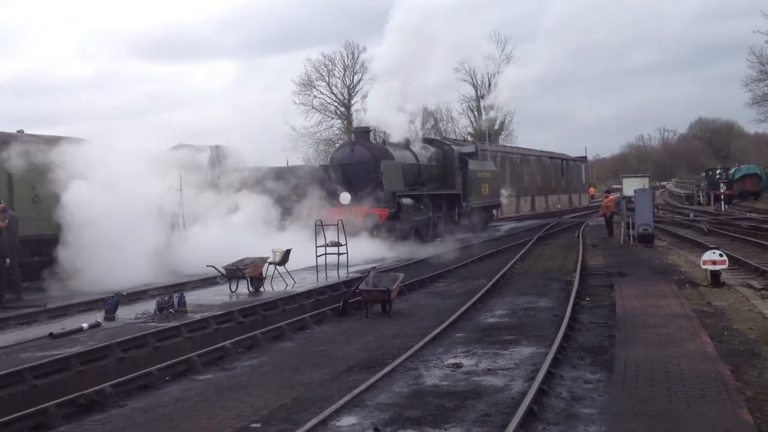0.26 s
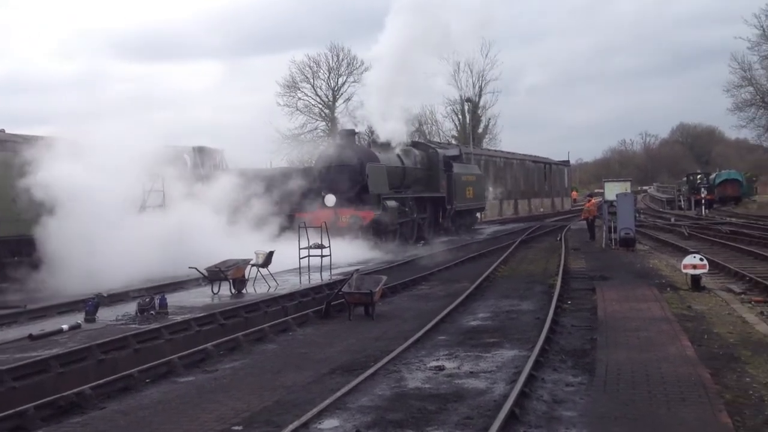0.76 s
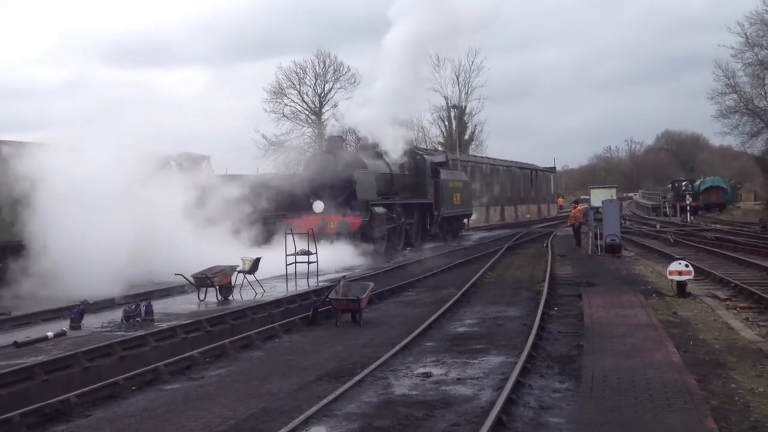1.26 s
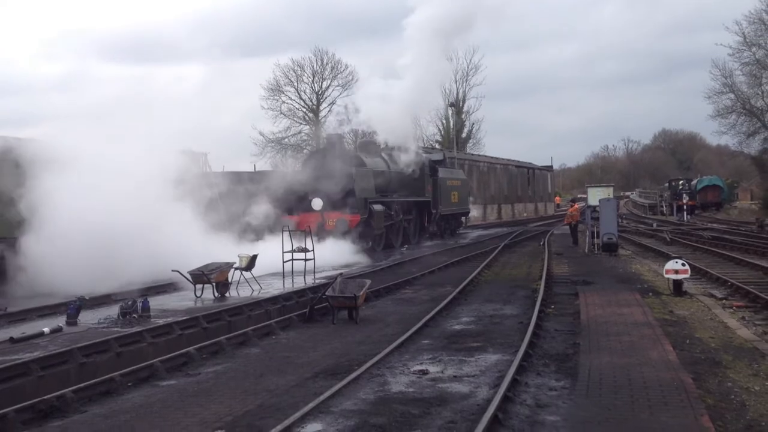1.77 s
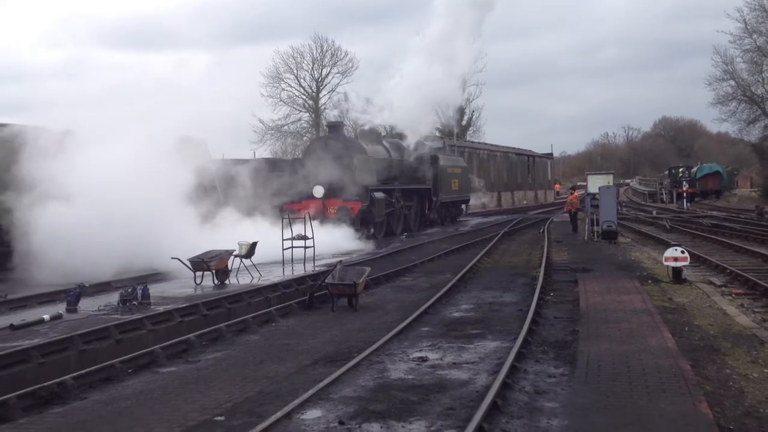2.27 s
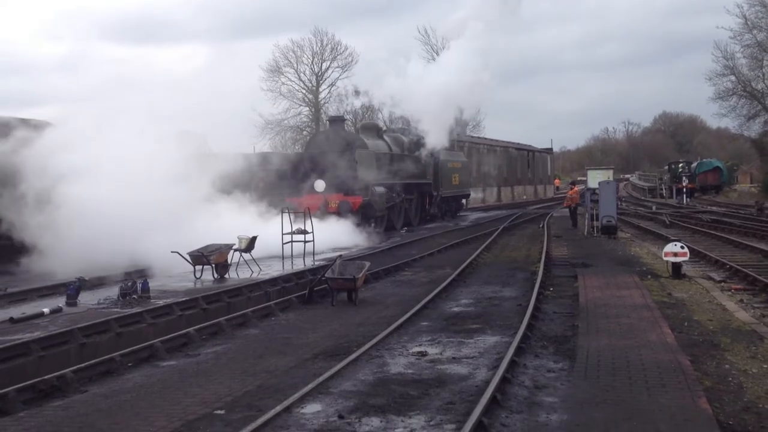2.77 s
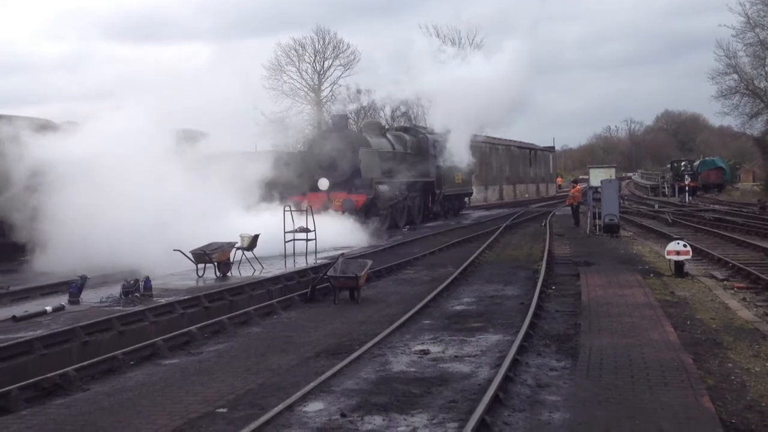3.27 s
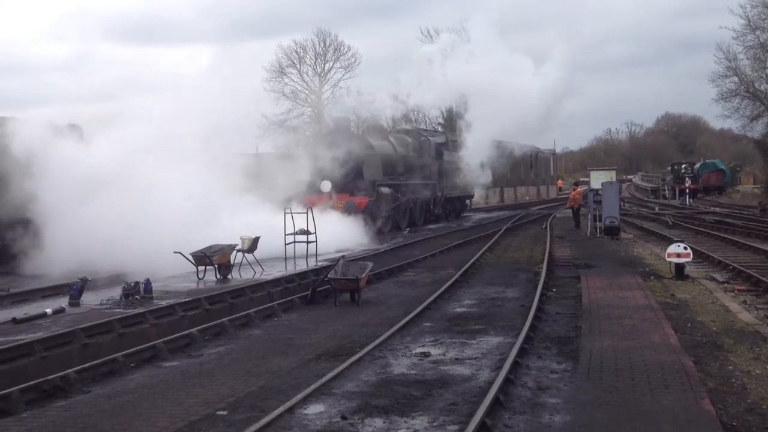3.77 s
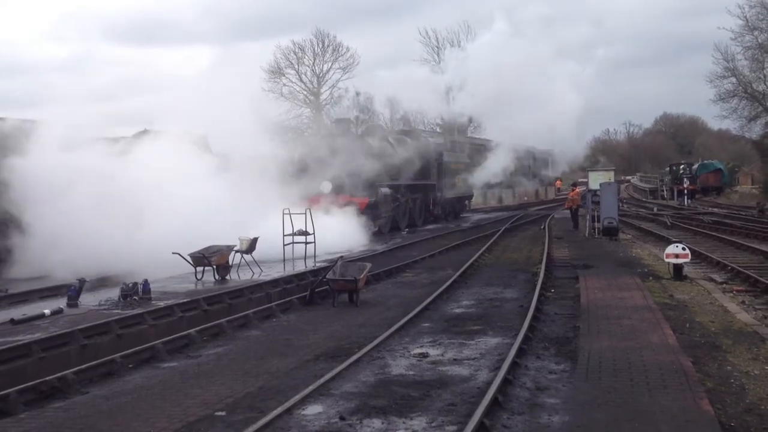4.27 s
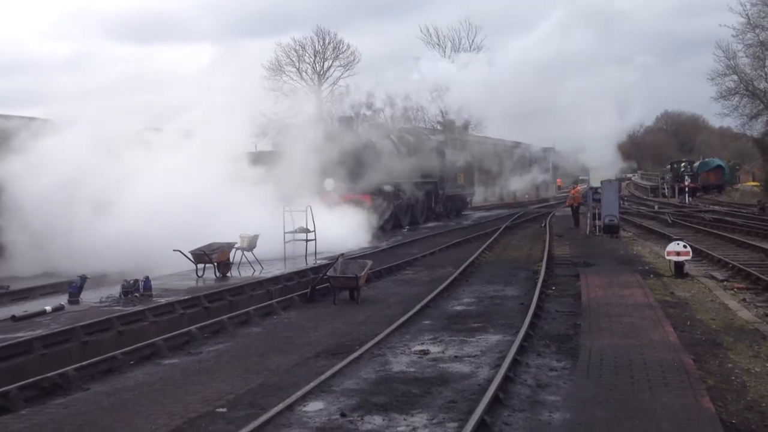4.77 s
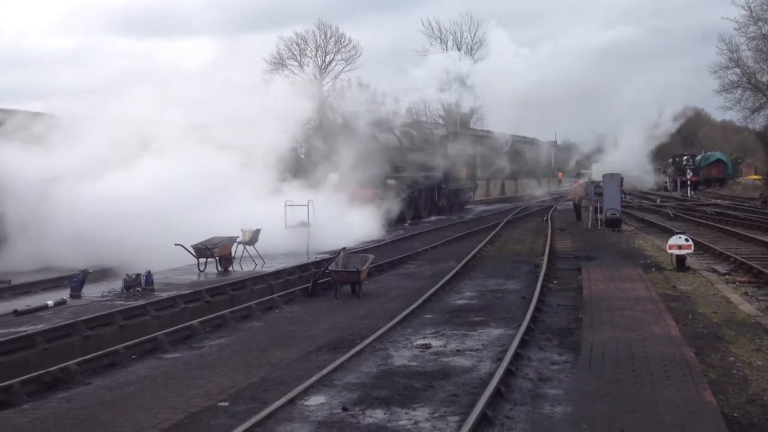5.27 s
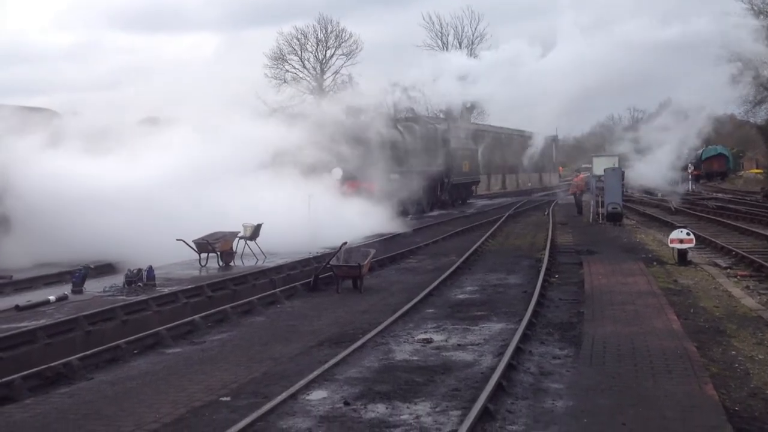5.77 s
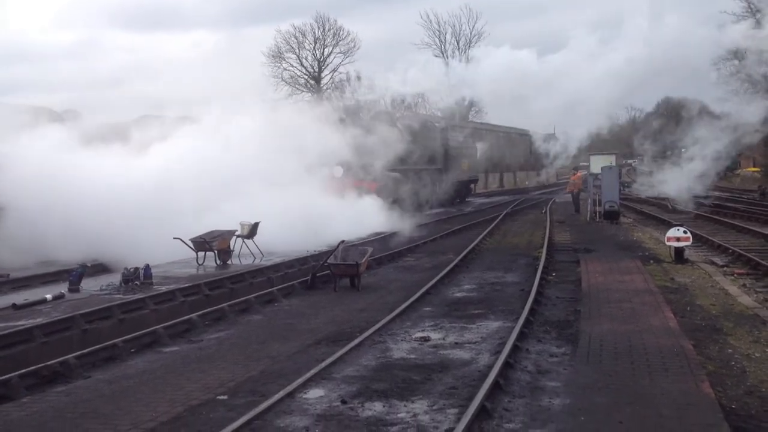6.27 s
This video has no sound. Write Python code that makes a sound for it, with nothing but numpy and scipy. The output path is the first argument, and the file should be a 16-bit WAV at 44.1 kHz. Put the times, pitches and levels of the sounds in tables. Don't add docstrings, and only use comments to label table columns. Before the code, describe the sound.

Unbroken steam hiss from an engine easing out of its shed. It starts moderate, with roar and wet hiss mixed, bulges with wet spray around one second and again near two, then sharpens into a loud, high, piercing jet through the middle. The treble briefly brightens near five seconds, then everything sinks to a softer, breathy rush. Open air, mid-distance, cheap camera microphone with hollow colouring.

```python
import sys
import numpy as np
from scipy import signal
from scipy.io import wavfile
from scipy.ndimage import uniform_filter1d

SR = 44100
rng = np.random.default_rng(int(sys.argv[2]) if len(sys.argv) > 2 else 0)


def gain_from_db(level_db):
    decades = np.asarray(level_db, float) / 20
    return 10 ** decades


def materialize(psi):
    bounded = np.clip(np.atleast_2d(psi).T, -1, 1)
    quanta = np.round(bounded * 32767).astype(np.int16)
    wavfile.write(sys.argv[1], SR, quanta)


N = 287973

# [t/s, level/dB]
BLOWER_LEVEL = [(0.0, -31), (0.14, -31.5), (1.62, -33), (2.07, -31.5), (2.14, -34), (2.85, -32),
                (2.89, -37.5), (3.05, -35), (3.38, -40.5), (3.56, -38.5), (4.35, -37.5), (4.71, -33),
                (5.51, -35.5), (6.53, -34)]
# [t/s, level/dB]
DULL_JET_LEVEL = [(0.0, -24), (0.02, -26.5), (0.14, -28.5), (0.53, -27), (0.95, -18), (1.31, -22.5),
                  (2.16, -20), (2.6, -25), (2.62, -20.5), (3.29, -25.5), (3.31, -31.5), (3.58, -30),
                  (3.6, -27), (4.42, -28.5), (5.04, -24), (5.65, -24.5), (6.15, -31), (6.53, -28.5)]
# [t/s, level/dB, centre f/Hz, sharpness of its edge/dB]
KEEN_JET_COURSE = [(0.0, -27, 6290, -10), (0.25, -29.5, 6220, -9.5), (1.05, -23, 7400, -11),
                   (1.51, -28.5, 6600, -16), (1.87, -28, 7350, -6.5), (2.14, -21, 5600, -9),
                   (2.6, -22.5, 6040, -13), (2.76, -17, 6030, -20), (2.96, -17, 6060, -22),
                   (3.25, -15, 6770, -11.5), (4.25, -16, 7130, -7), (4.58, -20.5, 6400, -10.5),
                   (4.76, -19, 8000, 0.5), (4.97, -18, 7600, -3.5), (5.16, -17, 6550, -12.5),
                   (5.65, -20, 7300, -10), (5.95, -30, 6400, -10), (6.53, -28.5, 6700, -8.5)]

# [f/Hz, density/dB per Hz]
ROAR_SPECTRUM = [(24, -77), (40, -52.5), (192, -1), (594, -6.5), (764, -4.5), (966, 3), (1030, -7),
                 (1150, -1.5), (1700, -6.5), (2210, -33), (3740, -120)]
# [f/Hz, density/dB per Hz]
ROAR_TOP_SPECTRUM = [(1300, -17), (1650, -3), (2000, 1.5), (2600, 0.5), (3200, 2.5)]
# [f/Hz, density/dB per Hz]
DULL_SPECTRUM = [(2200, -24), (2800, -5), (3300, -0.5), (3900, 2.5), (4400, -1.5), (5200, -24)]
# [f/Hz, density/dB per Hz]
DULL_TOP_SPECTRUM = [(3500, -23), (4150, -4), (4500, -5), (4900, -1), (5800, -22)]
# [f/Hz, density/dB per Hz]
KEEN_SPECTRUM = [(4000, 3), (5200, 5), (6500, 0), (8200, 3), (8900, -5.5), (10000, -23)]
# [f/Hz, density/dB per Hz]
SHOULDER_SPECTRUM = [(7600, -4.5), (8600, 2), (9400, -1.5), (10100, -10), (10800, -28), (12000, -34)]
# [f/Hz, density/dB per Hz]
TOP_HISS_SPECTRUM = [(9200, -26), (10600, 1.5), (11500, -3.5), (12400, 2), (13300, .3), (14100, -2),
                     (14800, -5), (15600, -5), (18000, -12)]

# [middle t/s, length/s, level/dB]
DRAUGHT_GULPS = [
    (.3, .15, -2),
    (.75, .2, -1),
    (1.0, .35, -2),
    (2.4, 0.36, -5.5),
    (2.78, 0.18, 1.5),
    (4.65, 0.39, 3.5),
    (5.5, 0.35, 1),
    (6.0, 0.19, -0.5),
]
# [middle t/s, length/s, level/dB]
WATER_SLUGS = [(.15, .2, 4.5), (.85, .2, 2), (1.15, .25, 3), (2.17, 0.29, 5.5), (2.55, 0.28, 3),
               (2.85, .3, 3.5), (3.85, 0.22, -3), (4.15, .3, -4), (4.55, .3, -3), (4.85, 0.37, -3),
               (5.17, 0.16, -1), (5.4, 0.25, -16), (5.68, .2, 2), (6.05, .3, -9), (6.4, .4, -5)]
# [middle t/s, length/s, level/dB]
KEEN_SPITS = [(.6, .3, -3), (.88, .2, 1.5), (1.08, 0.28, 2), (1.5, .3, 3), (2.1, .25, 2), (2.8, .15, 2),
              (2.95, .15, 1.5), (3.19, .2, 5.5), (3.5, .25, -8), (3.72, .2, -2), (3.95, .2, -1),
              (4.3, .1, 0), (4.43, 0.17, 5.5), (4.6, .2, 2), (5.0, .1, -5), (5.2, .1, -2), (5.38, .15, 3),
              (5.62, .15, 2), (6.3, .4, 3)]
# [middle t/s, length/s, level/dB]
VALVE_SURGES = [(.68, .15, -3), (.88, .25, 2), (2.57, .1, -2), (2.68, .12, 2), (2.93, .12, -2),
                (3.08, .12, 1.5), (3.55, .2, -1.5), (4.42, .2, 1.5), (4.65, .12, -2), (4.88, .12, 1.5),
                (5.15, .2, 1.5), (5.27, .08, -2), (6.08, .15, -1.5)]

# [delay/ms, level/dB]
YARD_ECHOES = [(3.1, -14.5), (4.7, -17), (7.1, -20.5), (10.9, -15), (15.3, -15), (21.7, -17)]
# [f/Hz, width/Hz, mean level/dB, wander/Hz]
PORT_NULLS = [(5000, 90, -4, 70), (9500, 60, -4, 40), (10100, 60, -5, 80), (10400, 115, -16, 70),
              (10960, 105, -17, 50), (11600, 70, -5, 50), (12800, 70, -4, 200), (13400, 70, -4, 150),
              (13800, 90, -7, 100), (14400, 80, -6, 100), (14750, 110, -8, 100), (15150, 80, -5, 60)]
# [f/Hz, width/Hz, level/dB]
HOUSING_RESONANCES = [(342, 13, 7), (440, 62, -3.5), (484, 33, 1), (555, 40, -7), (615, 143, 7),
                      (1052, 110, 4), (1510, 69, 4), (1570, 41, -7.5), (1742, 146, 3), (1854, 43, -3),
                      (2044, 380, 3), (2594, 125, -3.5), (2780, 440, 1), (3580, 630, 3.5),
                      (4000, 145, -3.5), (4365, 130, 3), (4550, 270, 6), (4920, 335, -6), (6400, 150, 1),
                      (10700, 150, 3)]
# [f/Hz, margin/dB]
MASKING_MARGIN = [(4800, 10.5), (9000, 8), (10000, 3.5), (11200, 3.8), (12500, 5.5), (14000, 3.5),
                  (16000, 3)]


def rms_one(x):
    return x / np.sqrt(np.mean(x ** 2) + 1e-20)


def in_time(rows):
    s, *columns = np.transpose(rows)
    return [np.interp(np.arange(N) / SR, s, column) for column in columns]


def swells(rows):
    s = np.arange(0, N, 64) / SR
    total_db = sum(db * np.exp(-8 * ((s - mid) / length) ** 2) for mid, length, db in rows)
    return np.interp(np.arange(N) / SR, s, total_db)


def both(a_db, b_db):
    return np.sqrt(gain_from_db(a_db) ** 2 + gain_from_db(b_db) ** 2)


def drift(rate):
    r = np.exp(-80 * np.pi * rate / SR)
    sparse = rng.standard_normal(N // 40 + 2002)
    slow = signal.lfilter([1], [1, -2 * r, r * r], sparse)[2000:]
    return np.interp(np.arange(N) / 40, np.arange(len(slow)), rms_one(slow))


def turbulence(spectrum, flutter_db, patchy_db, rate, centre_hz=None, lift_db=0., spread=.3, count=4):
    hz, db = np.transpose(spectrum)
    edges = hz[0] * 2 ** np.arange(0, np.log2(hz[-1] / hz[0]), 1 / count)
    white = rng.standard_normal((2, N))
    flutter = flutter_db * drift(rate)
    out = 0
    for k, (low, high) in enumerate(zip(edges, edges[1:])):
        mid = np.sqrt(low * high)
        band_pass = signal.butter(2, [low, high], "band", fs=SR, output="sos")
        band = signal.sosfilt(band_pass, white[k % 2])
        gain_db = np.interp(np.log(mid), np.log(hz), db) + flutter + patchy_db * drift(rate / 2)
        if centre_hz is not None:
            octaves_off = np.log2(mid / centre_hz)
            gain_db = gain_db + lift_db * np.exp(-.5 * (octaves_off / spread) ** 2)
        out = out + gain_from_db(gain_db) * band
    return rms_one(out)


def blower():
    (roar_db,), (cock_db,) = in_time(BLOWER_LEVEL), in_time(DULL_JET_LEVEL)
    roar = turbulence(ROAR_SPECTRUM, flutter_db=0.43, patchy_db=0.57, rate=7.3)
    top = turbulence(ROAR_TOP_SPECTRUM, flutter_db=-0.5, patchy_db=0.7, rate=7.3)
    stirred_db = -30.5 + 0.52 * (cock_db - cock_db.mean())
    top_gain = both(roar_db + 0.5, stirred_db) * gain_from_db(swells(DRAUGHT_GULPS))
    return gain_from_db(roar_db + 0.33) * roar + top_gain * top


def dull_jet():
    (level_db,), keen_db = in_time(DULL_JET_LEVEL), in_time(KEEN_JET_COURSE)[0]
    slug_db = swells(WATER_SLUGS)
    ring_hz = 4600 - 45 * np.arange(N) / SR
    body = turbulence(DULL_SPECTRUM, flutter_db=0.56, patchy_db=0.28, rate=26)
    ringing = turbulence(DULL_TOP_SPECTRUM, flutter_db=1.76, patchy_db=0.0, rate=25,
                         centre_hz=ring_hz, lift_db=5.0, spread=.06, count=10)
    body_gain = gain_from_db(level_db - 0.8 + .15 * slug_db)
    ring_gain = both(level_db - 3, keen_db - 12) * gain_from_db(slug_db)
    return body_gain * body + ring_gain * ringing


def keen_jet():
    level_db, centre_hz, edge_db = in_time(KEEN_JET_COURSE)
    (leak_db,), spit_db = in_time(BLOWER_LEVEL), swells(KEEN_SPITS)
    body = turbulence(KEEN_SPECTRUM, flutter_db=0.7, patchy_db=0.86, rate=20,
                      centre_hz=centre_hz, lift_db=14.0, spread=0.39, count=7)
    no_low_skirt = signal.butter(3, 3400, "high", fs=SR, output="sos")
    body = signal.sosfilt(no_low_skirt, body)
    shoulder = turbulence(SHOULDER_SPECTRUM, flutter_db=1.1, patchy_db=1.1, rate=11, count=7)
    hiss = turbulence(TOP_HISS_SPECTRUM, flutter_db=.8, patchy_db=.8, rate=30, count=7)

    body_gain = gain_from_db(level_db + 1.4 + 0.14 * spit_db + swells(VALVE_SURGES))
    shoulder_gain = both(level_db + edge_db + 0.7 + 0.59 * spit_db, leak_db - 17)
    hiss_db = level_db - 17.5 + 0.7 * (edge_db - edge_db.mean())
    hiss_gain = both(hiss_db + spit_db, leak_db - 20)
    return body_gain * body + shoulder_gain * shoulder + hiss_gain * hiss


def yard(x, sway_ms):
    at = np.arange(N)
    bright = signal.sosfilt(signal.butter(1, 700, "high", fs=SR, output="sos"), x)
    out = x
    for delay_ms, db in YARD_ECHOES:
        delay = (delay_ms + sway_ms * drift(0.702)) * SR / 1000
        out = out + gain_from_db(db) * np.interp(at - delay, at, bright)
    return out


def port_nulls(x, depth_spread, rate):
    hz, s, frames = signal.stft(x, SR, nperseg=1024)
    at = np.minimum(s * SR, N - 1).astype(int)
    ruling = np.clip((in_time(KEEN_JET_COURSE)[0][at] + 29) / 9, .25, 1)
    gain_db = 0
    for centre_hz, width_hz, db, wander_hz in PORT_NULLS:
        centre = centre_hz + wander_hz * drift(rate)[at]
        depth = db * ruling * np.maximum(1 + depth_spread * drift(rate)[at], 0)
        gain_db = gain_db + depth * np.exp(-.5 * ((hz[:, None] - centre) / width_hz) ** 2)
    return signal.istft(frames * gain_from_db(gain_db), SR, nperseg=1024)[1][..., :N]


def housing(x):
    for hz, width_hz, db in HOUSING_RESONANCES:
        a, w = gain_from_db(db / 2), 2 * np.pi * hz / SR
        alpha = np.pi * width_hz / SR
        top = [1 + alpha * a, -2 * np.cos(w), 1 - alpha * a]
        bottom = [1 + alpha / a, -2 * np.cos(w), 1 - alpha / a]
        x = signal.lfilter(top, bottom, x)
    return x


def lose_masked_treble(x, fall_db_per_khz, spread_db, wander_db):
    hz, s, frames = signal.stft(x[0], SR, nperseg=1024)
    power = uniform_filter1d(np.abs(frames) ** 2, size=4, axis=1)
    power = uniform_filter1d(power, size=4, axis=0)
    level = 10 * np.log10(power + 1e-20)
    fall = fall_db_per_khz * hz[:, None] / 1000
    from_below = np.maximum.accumulate(level + fall, axis=0) - fall - spread_db
    margin = np.interp(hz, *np.transpose(MASKING_MARGIN))[:, None]
    around = 10 * np.log10(uniform_filter1d(power, size=25, axis=0) + 1e-20) - margin
    wander = wander_db * drift(3.8)[np.minimum(s * SR, N - 1).astype(int)]
    masked = level < np.maximum(from_below, around) + wander
    masked = masked & (hz[:, None] > MASKING_MARGIN[0][0])
    return signal.istft(frames * ~masked, SR, nperseg=1024)[1][None, :N]


def scene():
    return gain_from_db(-1.2) * yard(blower() + dull_jet() + keen_jet(), sway_ms=.2)[None]


def band_limit(x):
    return signal.sosfilt(signal.butter(12, 15220, fs=SR, output="sos"), x)


def record(dry):
    ceiling = .66
    x = housing(port_nulls(dry, depth_spread=.45, rate=4)) / ceiling
    x = ceiling * x / (1 + np.abs(x) ** 8) ** (1 / 8)
    x = signal.sosfilt(signal.butter(1, 45, "high", fs=SR, output="sos"), x)
    x = lose_masked_treble(x, fall_db_per_khz=2.5, spread_db=24, wander_db=1.2)
    return band_limit(x)


dry = scene()
out = record(dry)
materialize(out)
```